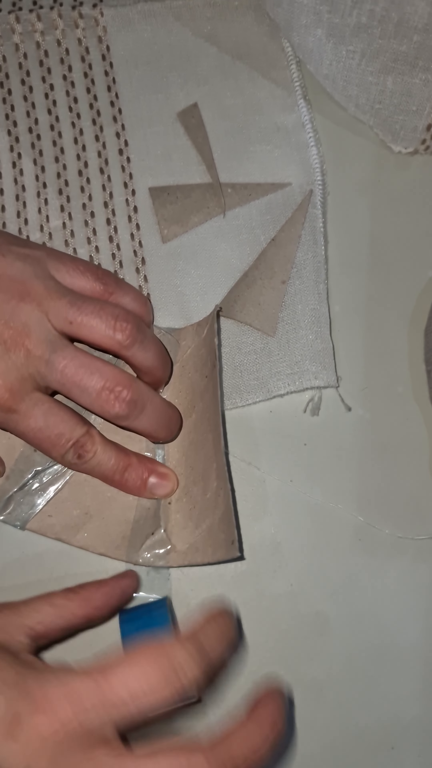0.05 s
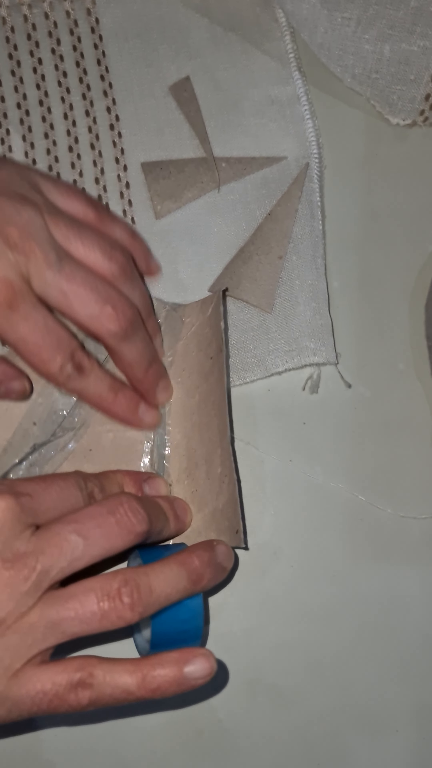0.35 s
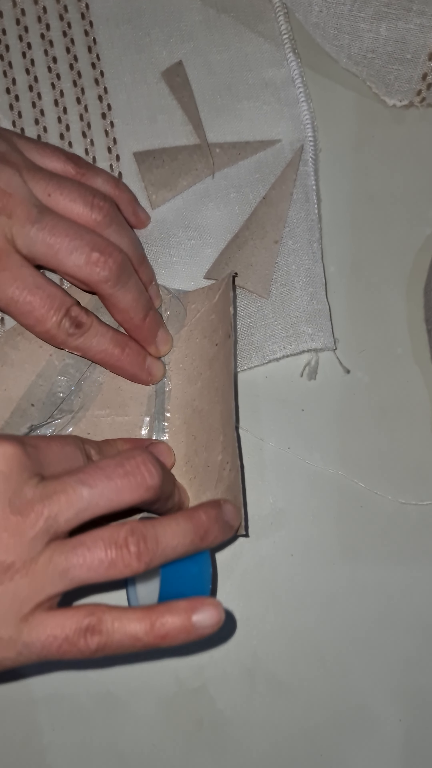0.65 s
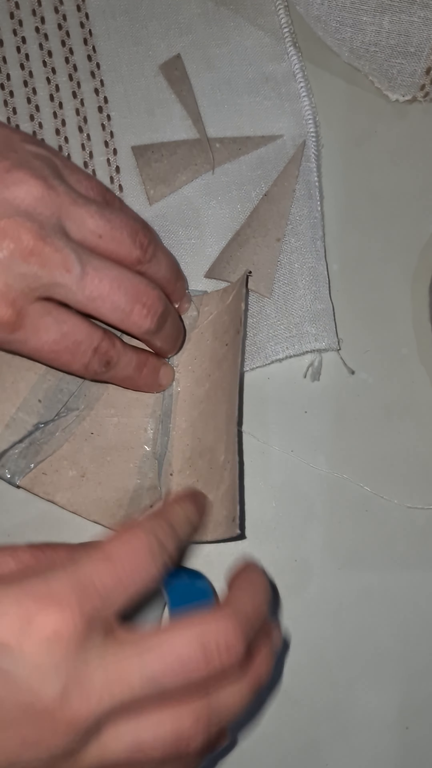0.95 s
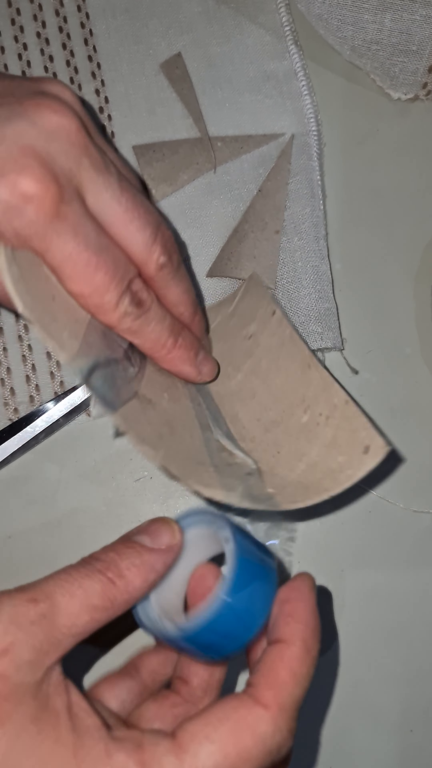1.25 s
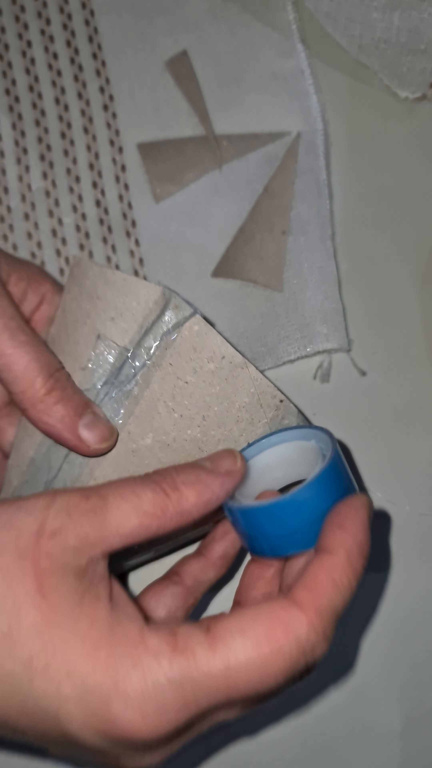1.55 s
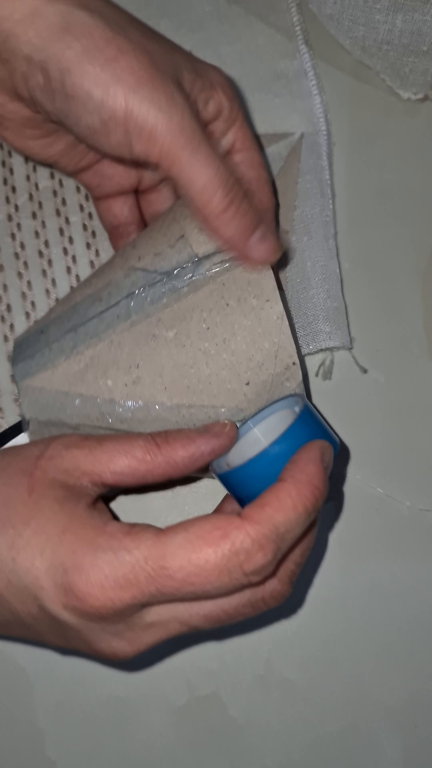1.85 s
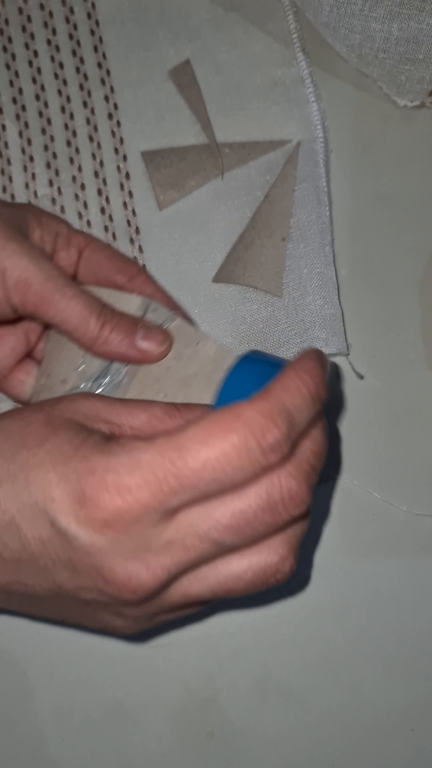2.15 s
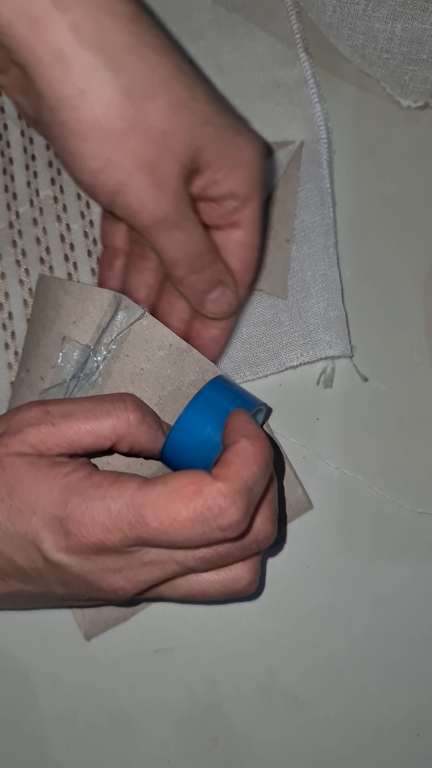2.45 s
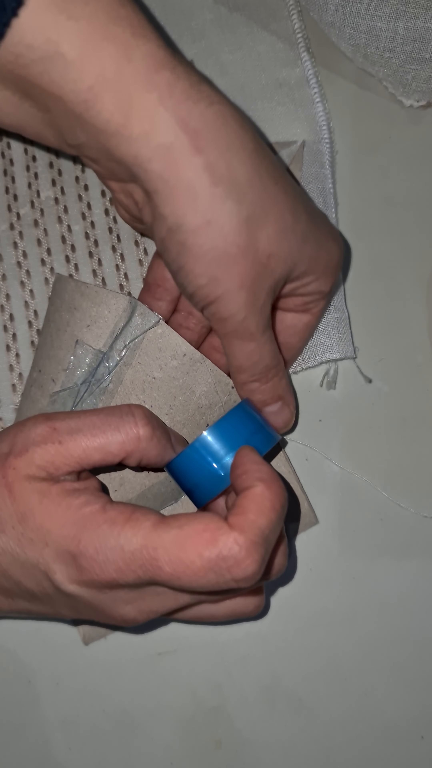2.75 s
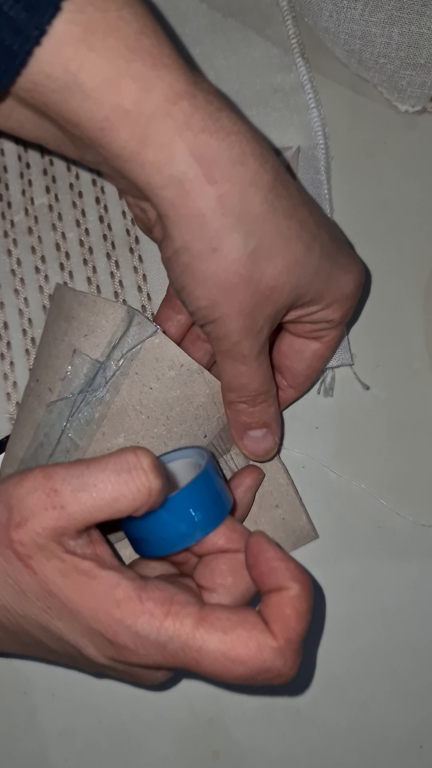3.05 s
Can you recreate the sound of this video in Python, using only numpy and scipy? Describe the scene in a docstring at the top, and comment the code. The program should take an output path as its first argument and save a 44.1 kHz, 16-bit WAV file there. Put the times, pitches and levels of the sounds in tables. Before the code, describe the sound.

Close to the microphone in a small room, hands handle taped card on a tabletop with soft rubs, ticks and bumps. A tape roll judders briefly and gives a hollow knock, then the sticky tape lets go in sharp snaps and a single quick rip. Thin, irregular crinkling continues as fingers work the tape onto the card, over still air and a very faint hum.

```python
"""Clear sticky tape snaps, rips once and crinkles as hands work it onto thin card on a table.
Each time the tape lets go, the jolt cracks the film, pushes the card and rings the hollow roll.
Roll, card and fingers knock the table's modes; the roll scrapes by stick and slip; fingers rub.
Heard close up in a small room, over still air and the faint hum of a distant appliance."""
import sys
import numpy as np
from scipy import signal
from scipy.fft import rfft, irfft, next_fast_len
from scipy.io import wavfile
from scipy.ndimage import uniform_filter1d, map_coordinates

SR = 44100
rng = np.random.default_rng(int(sys.argv[2]) if len(sys.argv) > 2 else 0)


def bounce(signal):
    """Save signal as a 16-bit WAV file at the path given by the first command-line argument."""
    frames = np.transpose(np.atleast_2d(signal))
    limited = np.clip(frames, -1, 1)
    pcm = np.round(limited * 32767).astype(np.int16)
    wavfile.write(sys.argv[1], SR, pcm)


N = 259911
SNAP_SAMPLES, LEAD_IN_S = 2048, 0.004

# tape lets go: (time [s], catches [count], card push [dB], roll ring [dB], film crack [dB],
# crack tilt [dB/oct], crease [Hz], left-right [dB])
TAPE_SNAPS = [(0.2025, 1, -31.5, -39, -33.5, 0, 3500, 5), (2.459, 1, -46, -22, -32, -1, 2800, -1),
              (2.5066, 2, -24, -10.5, -28, 0, 2850, -3), (3.103, 2, -26, -25, -22, 1.5, 3054, -1.5),
              (3.1393, 1, -27.5, -25, -22.5, 2.5, 2930, 0.5), (3.565, 2, -32, -21, -19.5, -0.5, 11000, 0),
              (3.6403, 1, -25, -18.5, -16.5, 5.5, 7250, 1), (3.6644, 5, -30, -17, -13, 1.5, 6200, -1),
              (3.6766, 5, -32.5, -24.5, -13.5, 1.5, 7530, -3.5), (3.6904, 5, -35, -15, -12, 1.5, 5490, 3),
              (3.7075, 3, -37.5, -24.5, -16.5, 2.5, 6080, -3.5),
              (4.2967, 1, -28, -32.5, -18.5, 0.5, 11960, -0.5),
              (4.5955, 1, -31, -32.5, -20, -4.5, 4120, -4), (4.6296, 1, -31.5, -52, -20, 1, 4056, -1.5),
              (4.6748, 2, -28.5, -40, -20.5, -2.5, 7340, 1.5),
              (4.7284, 2, -35.5, -34.5, -23, 4.5, 11600, 0.5)]
# a crease flips: (time [s], catches [count], crack [dB], card push [dB], crease [Hz], left-right [dB])
FILM_CRINKLES = [(0.022, 4, -31, -43, 3440, 1), (0.149, 1, -47, -58, 5000, 0),
                 (0.161, 1, -34.5, -55, 8400, 2), (0.349, 2, -47.5, -52, 4840, 1),
                 (0.4111, 1, -39.5, -67, 12500, 0), (0.4755, 1, -41, -42, 4540, -3),
                 (0.5465, 1, -35, -65, 7750, 1), (0.574, 1, -38, -48, 5600, -4),
                 (0.581, 3, -27, -42, 6050, -3), (0.7896, 1, -45, -58, 10000, 1),
                 (1.013, 1, -28.5, -67, 6960, 0), (1.0335, 1, -42, -48, 7400, -8),
                 (1.0396, 3, -28, -54, 7000, -1), (1.116, 1, -43.5, -71, 13100, 3),
                 (1.231, 5, -36, -53, 3100, -1.5), (1.3037, 1, -41, -59, 3150, 1),
                 (1.385, 1, -44, -59, 5400, -2), (2.0688, 1, -38, -62, 11600, 1),
                 (2.1227, 1, -30, -51, 7760, 1.5), (2.1597, 1, -31, -44, 7400, -2),
                 (2.6543, 1, -38.5, -67, 4020, -1), (3.837, 2, -41, -58, 5900, -1),
                 (3.868, 1, -33.5, -57, 9700, -5), (4.088, 1, -60.5, -73, 5000, -2),
                 (4.168, 2, -51, -73.5, 5220, -1), (4.331, 4, -37.5, -66, 10980, -1),
                 (4.401, 2, -40.5, -53.5, 12670, 3), (4.4099, 1, -36.5, -45.5, 12200, 1),
                 (4.844, 1, -37.5, -52, 9500, -5), (4.891, 1, -30.5, -51, 4750, -1.5),
                 (4.9127, 3, -28.5, -47.5, 4450, -1.5), (4.9465, 1, -37.5, -47, 12400, -3),
                 (4.9652, 4, -36.5, -45, 4270, -1), (5.0555, 1, -36.5, -50, 12470, -3.5),
                 (5.0898, 1, -38, -48.5, 4460, -0.5), (5.1883, 1, -35.5, -65, 4800, 8.5),
                 (5.2169, 1, -36, -51, 6400, -4), (5.3701, 1, -43.5, -43, 7730, 6),
                 (5.574, 1, -36, -58, 12680, -10.5), (5.5905, 1, -28, -40.5, 12600, -8),
                 (5.657, 1, -33.5, -60, 10700, -11), (5.68, 1, -38.5, -41, 11900, -6),
                 (5.7325, 1, -37.5, -57, 10400, -3)]
# roll taps the card: (time [s], roll ring [dB], card push [dB])
ROLL_TAPS = [(2.014, -39, -61), (2.183, -38.5, -52), (2.2869, -33, -39.5), (2.3151, -29.5, -38),
             (2.4689, -29, -42.5), (2.5918, -38, -54), (3.27, -31, -45.5), (3.481, -40, -62),
             (3.4873, -34, -60.5), (3.8127, -28, -31.5), (3.868, -36, -55), (5.3206, -40, -39),
             (5.5802, -43, -42)]
# film crack: (frequency [Hz], density [dB])
CRACK_SPECTRUM = [(300, -34.5), (1000, -30.5), (2200, 2), (3500, 2), (5500, 2), (7000, 1), (9000, -1),
                  (11500, -4.5), (15500, -10), (17000, -24)]
# pushed card: (frequency [Hz], density [dB])
PUSH_SPECTRUM = [(30, -14.5), (130, -8.5), (350, -3.5), (750, -3.5), (1100, -2.5), (2000, -19),
                 (6000, -60.5)]
# hollow of the roll: (centre [Hz], width [Hz], gain [dB])
ROLL_MODES = [(1054, 460, -2.5), (1390, 373, 11.5), (1833, 430, 1.5), (3150, 300, -14.5), (4970, 160, -16)]
# grip shifts the roll's modes: (time [s], pitch [ratio])
GRIP_PITCH = [(1.9, 0.98), (2.46, 1.01), (2.507, 1.18), (2.7, 1.4), (3.1, 1.12), (3.56, 1.07),
              (3.68, 1.136), (3.85, 1.05), (5.3, 1.22)]
# roll, card or finger hits the table: (time [s], relative level [dB], contact brightness [Hz])
TABLE_KNOCKS = [(0.0924, -22, 402), (0.2026, -26, 440), (0.452, -34, 790), (.476, -54, 400),
                (0.76, -45, 724), (.862, -35, 760), (1.06, -40.5, 350), (1.139, -48, 550),
                (1.192, -43, 280), (1.214, -39, 360), (1.75, -39, 890), (2.509, -38, 242),
                (2.703, -49, 285.3), (3.104, -37.5, 400), (3.141, -39, 380), (3.274, -51.5, 318),
                (3.667, -36.5, 370), (3.696, -34.5, 338), (5.826, -46.5, 940)]
# hand bumps the table: (time [s], relative level [dB])
HAND_THUDS = [(.093, -48), (.346, -48), (.572, -31), (0.615, -43.5), (2.507, -36.5), (3.669, -36.5)]
# table top: (frequency [Hz], level [dB], t60 [s])
TABLE_MODES = [(151, -9, .3), (215, -10, .16), (300, -2, .14), (345, -3, .12), (385, -4, .11), (458, 0, .1),
               (530, -3, .08), (608, -3, .08), (760, -6, .05), (900, -7, .045), (1040, -7, .04),
               (1270, -10, .03)]
# slow bending of the table: (frequency [Hz], level [dB], t60 [s])
BENDING_MODES = [(45, -11, 0.12), (77.4, -1.5, 0.13), (93.6, -9, 0.14), (158, -13.5, 0.31)]
# roll judders over the card: (start [s], end [s], level [dB], slip rate [1/s])
ROLL_SCRAPES = [(1.875, 1.944, -24.5, 370), (2.016, 2.037, -45, 390), (2.323, 2.388, -36.5, 310),
                (2.478, 2.505, -44, 290)]
# card as a sounding board: (centre [Hz], width [Hz], gain [dB])
CARD_MODES = [(374, 70, -7), (597, 72, 6), (830, 89, 5)]
# finger strokes: (start [s], end [s], on roll [dB], on card [dB], on film [dB])
FINGER_STROKES = [(0.0, 0, -60, -42.5, -49.5), (0.09, 0.18, -74, -54.5, -82), (0.35, 0.39, -77, -59, -72),
                  (0.45, 0.56, -73, -51.5, -57), (0.575, 0.6, -66, -44, -45.5),
                  (0.76, 0.87, -65, -56.5, -68), (0.98, 1.03, -77, -59, -64),
                  (1.04, 1.07, -80, -48.5, -48.5), (1.24, 1.35, -72, -56.5, -64),
                  (1.37, 1.66, -78, -63.5, -63.5), (1.691, 1.77, -51.5, -51.5, -68),
                  (1.902, 1.94, -47, -44, -50.5), (1.955, 2.04, -43, -55, -55),
                  (2.14, 2.18, -43.5, -50.5, -48), (2.208, 2.24, -46.5, -52, -59),
                  (2.339, 2.375, -42.5, -46.5, -60), (2.41, 2.47, -45.5, -53, -58),
                  (2.467, 2.55, -39, -43, -43), (2.58, 2.67, -65, -61, -54), (2.71, 2.773, -55, -57, -59),
                  (2.854, 3.0, -64.5, -63, -67), (3.025, 3.094, -53.5, -55.5, -62),
                  (3.099, 3.17, -49.5, -42.5, -53), (3.254, 3.275, -51.5, -57, -52),
                  (3.367, 3.385, -52.5, -53.5, -58), (3.485, 3.51, -56, -51, -55),
                  (3.549, 3.63, -49.5, -53.5, -48.5), (3.824, 3.837, -49, -61.5, -47.5),
                  (3.9, 3.99, -61.5, -70, -65), (4.385, 4.41, -68, -62.5, -58.5),
                  (4.783, 4.98, -74, -58.5, -57), (5.075, 5.25, -67, -68.5, -57),
                  (5.314, 5.38, -50, -51, -48.5), (5.414, 5.53, -63, -54, -55.5),
                  (5.574, 5.605, -61, -46.5, -45.5), (5.652, 5.69, -70, -46.5, -47.5),
                  (5.718, 5.89, -67, -59.5, -58)]
# rubbed card: (frequency [Hz], density [dB])
CARD_RUB_SPECTRUM = [(150, -23), (450, -9), (800, -0.5), (1500, -2), (3200, 1.5), (5000, -6.5), (8000, -12),
                     (16000, -28)]
# rubbed film: (frequency [Hz], density [dB])
FILM_RUB_SPECTRUM = [(500, -31), (2500, -15.5), (4500, -9), (6500, -6), (10000, -8.5), (15500, -11),
                     (16500, -27.5)]
# hands shift the card: (time [s], relative level [dB])
HAND_MOTION = [(0.0, -47), (0.3, -55.5), (0.9, -59), (1.21, -51), (1.5, -64), (2.0, -55), (2.85, -63.5),
               (3.3, -57), (4.0, -66), (4.7, -66.5), (5.4, -62), (5.89, -65)]
# shifting card: (frequency [Hz], density [dB])
RUMBLE_SPECTRUM = [(15, -20), (40, -12), (70, 0.5), (120, -13.5), (220, -9), (400, -5), (800, -25.5),
                   (2500, -66)]
# fingertip slides: (middle [s], 1/e half length [s], level [dB], centre [Hz])
FINGER_SWISHES = [(1.163, 0.0057, -51.5, 2700), (1.504, 0.012, -54, 6700), (1.67, 0.017, -52.5, 6930),
                  (2.746, 0.038, -57.5, 3960), (4.955, 0.033, -49, 2260)]
# room tail: (frequency [Hz], t60 [s])
TAIL_DECAY = [(100, 0.3), (400, 0.097), (1500, 0.23), (5000, 0.093), (15000, .2)]
# room tail: (frequency [Hz], gain [dB])
TAIL_GAIN = [(60, -10.5), (160, -8.5), (350, -6), (700, -10.5), (1600, -18), (4000, -11.5), (9000, -15),
             (16000, -24.5)]
# distant appliance: (frequency [Hz], level [dB])
APPLIANCE_TONES = [(150.7, -68), (268, -62)]
# room air: (frequency [Hz], density [dB])
AIR_SPECTRUM = [(15, -34.5), (25, -14), (157, -10), (195, -4.5), (263, -7), (489, -18.5), (775, -17),
                (1070, -18), (1290, -19), (1440, -30), (1560, -26.5), (2160, -29), (10100, -36.5),
                (16000, -48)]
# likeness of the two microphone ports: (frequency [Hz], correlation [-1..1])
PORT_CORRELATION = [(100, 0.89), (600, 0.29), (1500, 0.27), (3200, 0.028), (5500, 0.11), (8000, 0.063),
                    (15000, -0.047)]


def snaps(card_t60_s=0.019, roll_t60_s=0.013, film_t60_s=0.011, catch_gap_s=0.001,
          pivot_hz=6000, crease_db=7, crease_oct=0.26):
    """Each jolt pushes the card, rings the roll and cracks the film at its crease's pitch."""
    out = np.zeros((2, N))
    for s, catches, push_db, ring_db, crack_db, tilt_db_per_oct, crease_hz, pan_db in jolts():
        length_s = max(round(catches) - 1, 0) * catch_gap_s
        # a small snap flips one crease only, so it rings purer
        peak_db = crease_db + 0.094 * np.clip(-22 - crack_db, -10, 15)
        crease = lambda hz: peak_db * np.exp(-(np.log2((hz + 1) / crease_hz) / crease_oct) ** 2)
        tilt = lambda hz: tilt_db_per_oct * np.log2(np.maximum(hz, 2500) / pivot_hz)
        film = lambda hz: min_phase(along(CRACK_SPECTRUM, hz) + crease(hz) + tilt(hz))
        push = slip(length_s, card_t60_s, lambda hz: min_phase(along(PUSH_SPECTRUM, hz)), jolt=5.5)
        ring = slip(length_s, roll_t60_s, lambda hz: roll_hollow(hz, s), jolt=7.6)
        crack = port_lag(slip(length_s, film_t60_s, film, jolt=1.4))
        crack *= amp([[pan_db / 2], [-pan_db / 2]])
        add(out, s - LEAD_IN_S, amp(push_db) * push + amp(ring_db) * ring + amp(crack_db) * crack)
    return out


def jolts(crinkle_ring_db=-26, mid_crease_hz=6900, tick_db=-21, tick_db_per_oct=-6.5, tick_hz=3036):
    """Snaps, crinkles and taps: one kind of jolt, shared differently by card, roll and film."""
    rows = list(TAPE_SNAPS)
    for s, catches, crack_db, push_db, hz, pan_db in FILM_CRINKLES:
        tilt = 2.3 + 2.3 * np.log2(hz / mid_crease_hz)  # tighter crease, brighter crack
        rows.append((s, catches, push_db, crack_db + crinkle_ring_db, crack_db, tilt, hz, pan_db))
    for s, ring_db, push_db in ROLL_TAPS:
        rows.append((s, 1, push_db, ring_db, ring_db + tick_db, tick_db_per_oct, tick_hz, 0))
    return rows


def slip(length_s, t60_s, response, jolt, rise_s=0.00018, lead_in_db=-23):
    """A faint, short rise of noise leads into a jolt, which crackles for length_s and dies away."""
    t = np.arange(SNAP_SAMPLES) / SR - LEAD_IN_S
    onset = np.exp(np.minimum(t, 0) / rise_s) + amp(lead_in_db) * np.clip(1 + t / LEAD_IN_S, 0, 1)
    decay = amp(-60 * np.maximum(t - length_s, 0) / t60_s)
    force = rng.standard_normal((2, SNAP_SAMPLES)) * onset * decay
    force[0, round(LEAD_IN_S * SR)] += jolt
    return with_energy(stereo(filtered(force, response)), seconds=0.005)


def roll_hollow(hz, time_s, edge_hz=7000):
    """Response of the roll as gripped at that time; its soft wall gives off little treble."""
    pitch = np.interp(time_s, *np.transpose(GRIP_PITCH))
    return resonances(ROLL_MODES, hz / pitch) * lowpass(hz, edge_hz, damping=1.4)


def knocks(gain_db=-2, focus_db=9, max_bass_cut_db=14, contact_db=-5, edge_ratio=1.9):
    """Hard contacts wake the table's high modes, soft ones the low."""
    out = np.zeros((2, N))
    for s, db, contact_hz in TABLE_KNOCKS:
        modes = []
        for hz, mode_db, t60_s in TABLE_MODES:
            cut_db = focus_db * np.log2(hz / contact_hz) ** 2
            if hz < contact_hz:
                cut_db = min(cut_db, max_bass_cut_db)
            modes.append((hz, mode_db - cut_db, t60_s))
        # one short push, rounded by the give of card and skin
        contact = ringing([(contact_hz, 0, 4 / contact_hz)])
        knock = unit(ringing(modes)) + amp(contact_db) * unit(contact)
        knock = filtered(knock, lambda hz: lowpass(hz, edge_ratio * contact_hz, damping=1.2))
        add(out, s, amp(db + gain_db) * with_energy(knock, seconds=0.016))
    return out


def thuds(gain_db=-2, edge_hz=200):
    """A hand bends the whole table top."""
    out = np.zeros((2, N))
    for s, db in HAND_THUDS:
        thud = filtered(ringing(BENDING_MODES), lambda hz: lowpass(hz, edge_hz, damping=2))
        add(out, s, amp(db + gain_db) * with_energy(thud, seconds=0.064))
    return out


def scrapes(jitter=0.21, spread_db=2, hiss=0.16, card_db=-9, rise_s=0.002):
    """Uneven stick and slip drives the roll; the card joins in as pressure grows."""
    def radiate(drive, response):
        padded = np.pad(drive, ((0, 0), (0, SNAP_SAMPLES)))
        return with_energy(stereo(filtered(padded, response)), drive.shape[1] / SR)

    out = np.zeros((2, N))
    for start_s, end_s, db, slips_per_s in ROLL_SCRAPES:
        n = int((end_s - start_s) * SR)
        t = np.arange(n) / SR
        gaps = np.exp(jitter * rng.standard_normal(SNAP_SAMPLES)) * SR / slips_per_s
        slips = np.cumsum(gaps).astype(int)
        slips = slips[slips < n]
        force = hiss * rng.standard_normal((2, n))
        force[0, slips] += amp(spread_db * rng.standard_normal(len(slips)))
        force *= 1 - np.exp(-t / rise_s)
        pressure = 0.3 + t / t[-1]
        hollow = radiate(force, lambda hz: roll_hollow(hz, start_s))
        card = radiate(force * pressure, lambda hz: resonances(CARD_MODES, hz))
        add(out, start_s, amp(db) * (hollow + amp(card_db) * card))
    return out


def rubbing(rumble_db=-1, unsteady_db=1.5):
    """Fingers slide with unsteady pressure; roll, card and film each rasp in their own band."""
    on_roll, on_card, on_film = rub_gains() * amp(unsteady_db * wobble(45))
    rumble = amp(rumble_db) * hand_gain() * shaped(rng.standard_normal((2, N)), RUMBLE_SPECTRUM)
    roll_force = friction(700, spread_db=4, hiss=0.7)
    hollow = unit(stereo(filtered(roll_force, lambda hz: roll_hollow(hz, time_s=3.3))))
    card = shaped(contact_drift(friction(400, spread_db=3.9, hiss=1.1)), CARD_RUB_SPECTRUM)
    film = shaped(contact_drift(friction(500, spread_db=3.2, hiss=1.0)), FILM_RUB_SPECTRUM)
    return rumble + on_roll * hollow + on_card * card + on_film * film


def rub_gains(attack_s=0.0128, swell_db=-2, release_db_per_s=261, settle_db_per_s=189,
              settle_db=(-38, -28.5, -27), resting_db=(-10.5, -8, -21)):
    """Gains on (roll, card, film): strokes, film settling after each jolt, resting fingers."""
    power = np.zeros((3, N))
    t = np.arange(SR * 3 // 4) / SR
    attack = np.minimum(t / attack_s, 1) ** 2
    held_s = t - attack_s
    for start_s, end_s, *levels_db in FINGER_STROKES:
        length_s = max(end_s - start_s, attack_s / 2)
        pressure_db = swell_db * (np.clip(held_s / length_s, 0, 1) - 0.5)
        release_db = release_db_per_s * np.maximum(held_s - length_s, 0)
        stroke = attack * amp(pressure_db - release_db)
        add(power, start_s - attack_s, np.outer(amp(levels_db), stroke) ** 2)
    settling = np.outer(amp(settle_db), amp(-settle_db_per_s * t))
    for s, _, _, _, crack_db, *_ in jolts():
        add(power, s, (amp(crack_db) * settling) ** 2)
    resting = np.outer(amp(resting_db), hand_gain())
    return np.sqrt(power + resting ** 2)


def hand_gain():
    """Gain of the hands' slow movement."""
    return amp(np.interp(np.arange(N) / SR, *np.transpose(HAND_MOTION)))


def friction(catches_per_s, spread_db, hiss):
    """Tiny catches of uneven size over an even hiss."""
    size = np.minimum(rng.exponential(size=N), 2.5)
    catches = (rng.random(N) < catches_per_s / SR) * amp(spread_db * size)
    return unit(catches * rng.standard_normal((2, N))) + hiss * rng.standard_normal((2, N))


def contact_drift(x, depth_db=4):
    """A rub's colour drifts as the point of contact moves."""
    spectra = signal.stft(x, nperseg=256)[2]
    colour = uniform_filter1d(rng.standard_normal(spectra.shape[1:]), size=8, axis=0)
    colour = uniform_filter1d(colour, size=20, axis=1)
    spectra *= amp(depth_db * unit(colour))
    return unit(signal.istft(spectra, nperseg=256)[1][:, :N])


def swishes(width_oct=0.28):
    """A fingertip slides: a narrow band of hiss swells and fades."""
    t = np.arange(SR // 4) / SR
    middle_s = t[SR // 8]
    out = np.zeros((2, N))
    for s, half_s, db, centre_hz in FINGER_SWISHES:
        band = lambda hz: np.exp(-(np.log2((hz + 1) / centre_hz) / width_oct) ** 2)
        hiss = unit(stereo(filtered(rng.standard_normal((2, len(t))), band)))
        swell = np.exp(-((t - middle_s) / half_s) ** 2)
        add(out, s - middle_s, amp(db) * hiss * swell)
    return out


def room(x, wall_db=-21, wall_delay_s=0.0098, build_s=0.0027, drift_hz=1):
    """A near wall's echo and a tail; two tails crossfade for the movement of the hands."""
    hz, t, noise = signal.stft(rng.standard_normal((2, 2, SR // 3)), SR, nperseg=256)
    decay = amp(-60 * t / along(TAIL_DECAY, hz)[:, None]) * (1 - np.exp(-t / build_s))
    energy = np.sum(decay ** 2, axis=1, keepdims=True) * t[1] * SR
    decay *= amp(along(TAIL_GAIN, hz))[:, None] / np.sqrt(energy)
    tails = signal.istft(noise * decay, SR, nperseg=256)[1]
    first, second = (signal.fftconvolve(x, tail, axes=1)[:, :N] for tail in tails)
    angle = 2 * np.pi * drift_hz * np.arange(N) / SR
    wet = np.cos(angle) * first + np.sin(angle) * second
    return stereo(wet) + amp(wall_db) * delayed(x[::-1], wall_delay_s)


def background(air_db=-63, waver_db=3.1, waver_rad=2.4):
    """A distant appliance's wavering hum and still room air."""
    t = np.arange(N) / SR
    hum = sum(amp(db + waver_db * wobble(5)) * np.sin(2 * np.pi * hz * t + waver_rad * wobble(12))
              for hz, db in APPLIANCE_TONES)
    return hum + amp(air_db) * shaped(rng.standard_normal((2, N)), AIR_SPECTRUM)


def stereo(pair):
    """Two unrelated signals to left and right: alike in the bass, apart in the treble."""
    angle = lambda hz: np.arccos(along(PORT_CORRELATION, hz)) / 2
    mid, side = filtered(pair, lambda hz: np.array([np.cos(angle(hz)), np.sin(angle(hz))]))
    return np.array([mid + side, mid - side])


def port_lag(pair, lag_s=0.000066, direct=0.37):
    """Direct sound reaches the left port before the right."""
    left, right = pair
    return np.array([left, direct * delayed(left, lag_s) + np.sqrt(1 - direct ** 2) * right])


def shaped(pair, spectrum):
    """Stereo sound of rms 1, coloured by the spectrum."""
    return unit(stereo(filtered(pair, lambda hz: amp(along(spectrum, hz)))))


def ringing(modes, length_s=0.3, spread_db=0.5):
    """Damped modes, struck at slightly new strengths each time."""
    t = np.arange(int(length_s * SR)) / SR
    return sum((-1) ** k * amp(db + rng.normal(0, spread_db) - 60 * t / t60_s)
               * np.sin(2 * np.pi * hz * t) for k, (hz, db, t60_s) in enumerate(modes))


def resonances(modes, hz):
    """Complex response of band-pass modes of alternating sign."""
    return sum((-1) ** k * amp(db) * 1j * hz * width / (centre ** 2 - hz ** 2 + 1j * hz * width)
               for k, (centre, width, db) in enumerate(modes))


def lowpass(hz, edge_hz, damping):
    """Two-pole low-pass response."""
    return 1 / (1 + 1j * damping * hz / edge_hz - (hz / edge_hz) ** 2)


def min_phase(db):
    """Minimum-phase response with this gain."""
    cepstrum = irfft(np.log(amp(db)))
    half = len(cepstrum) // 2
    cepstrum[1:half] *= 2
    cepstrum[half + 1:] = 0
    return np.exp(rfft(cepstrum))


def filtered(x, response):
    """Apply a complex response of frequency."""
    size = 2 * next_fast_len(x.shape[-1] // 2 + SNAP_SAMPLES)
    hz = np.fft.rfftfreq(size, 1 / SR)
    return irfft(rfft(x, size) * response(hz), size)[..., :x.shape[-1]]


def delayed(x, delay_s):
    """Fractional delay."""
    return filtered(x, lambda hz: np.exp(-2j * np.pi * hz * delay_s))


def along(points, hz):
    """Interpolate (frequency [Hz], value) on a log axis."""
    knots_hz, values = np.transpose(points)
    return np.interp(np.log(hz + 1), np.log(knots_hz + 1), values)


def wobble(knots_per_s):
    """Smooth random curve."""
    knots = rng.standard_normal(int(N * knots_per_s / SR) + 4)
    return map_coordinates(knots, [np.arange(N) * knots_per_s / SR])


def add(track, start_s, x):
    """Mix x into the track."""
    part = track[:, max(round(start_s * SR), 0):][:, :x.shape[-1]]
    part += x[..., :part.shape[1]]


def amp(db):
    """Decibels to gain."""
    return 10 ** (np.asarray(db) / 20)


def unit(x):
    """Scale to rms 1."""
    return x / np.sqrt(np.mean(x ** 2) + 1e-20)


def with_energy(x, seconds):
    """Scale to the energy of rms 1 held that long."""
    return unit(x) * np.sqrt(seconds * SR / x.shape[-1])


def scene(pan_db=0.77):
    """The work on the table, slightly left, in its room."""
    work = snaps() + knocks() + thuds() + scrapes() + rubbing() + swishes()
    work *= amp([[pan_db], [-pan_db]])
    return work + room(work) + background()


def record(dry, low_hz=38, top_hz=16500):
    """Microphone: deep bass cut, clipping at full scale, steep band limit."""
    heard = filtered(dry, lambda hz: -hz ** 2 / (low_hz ** 2 - hz ** 2 + 1.2j * hz * low_hz))
    return filtered(np.clip(heard, -1, 1), lambda hz: 1 / np.sqrt(1 + (hz / top_hz) ** 260))


dry = scene()
out = record(dry)
bounce(out)
```